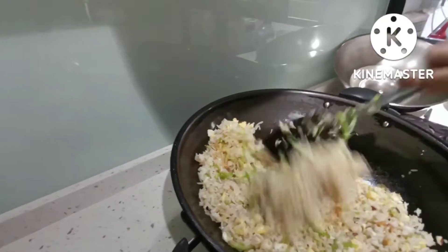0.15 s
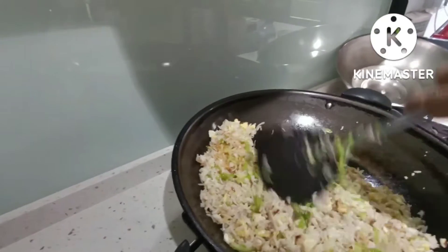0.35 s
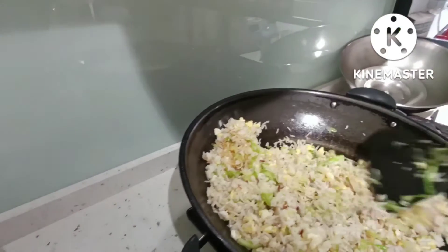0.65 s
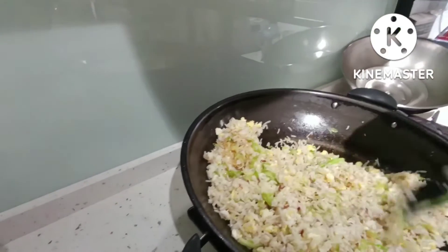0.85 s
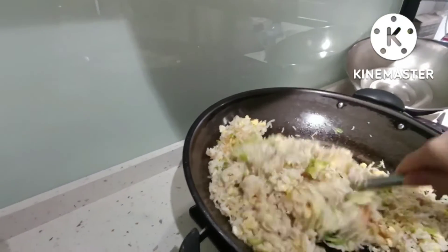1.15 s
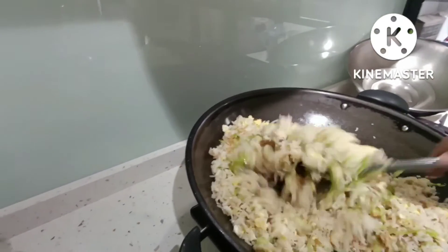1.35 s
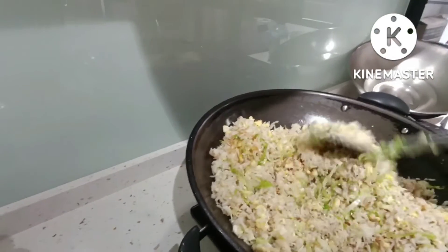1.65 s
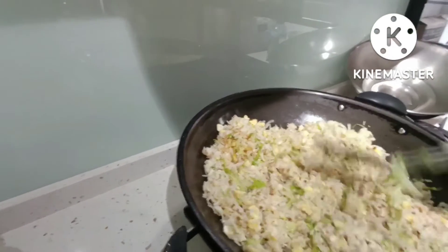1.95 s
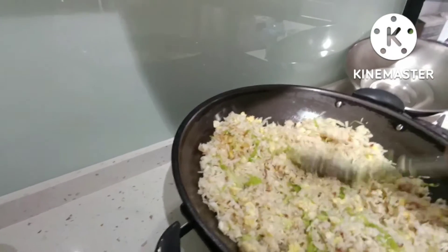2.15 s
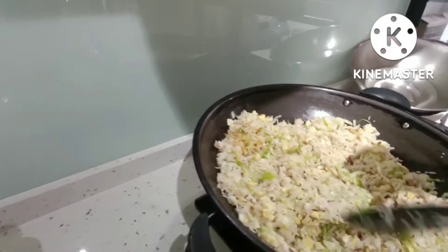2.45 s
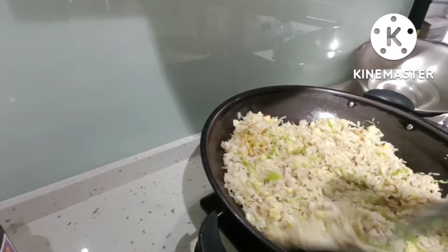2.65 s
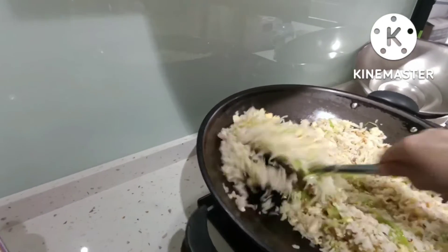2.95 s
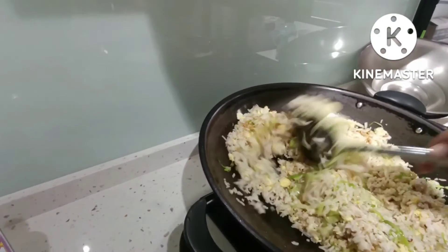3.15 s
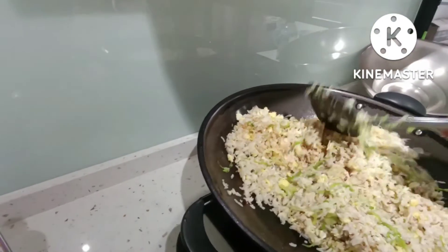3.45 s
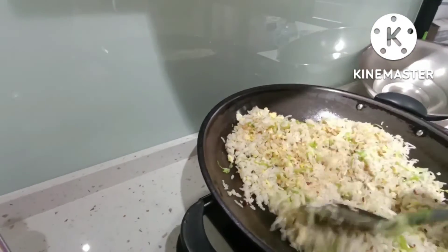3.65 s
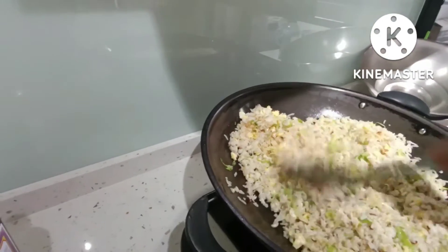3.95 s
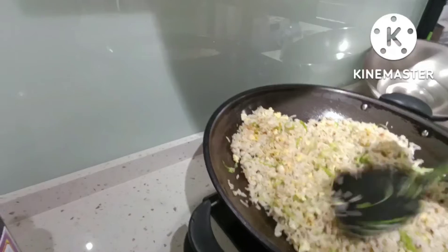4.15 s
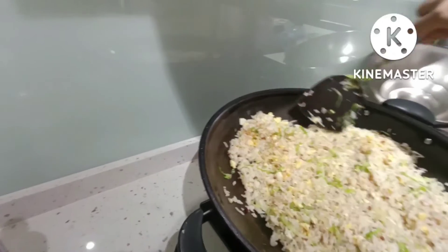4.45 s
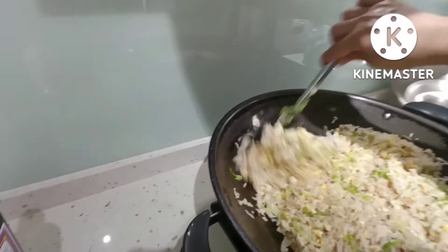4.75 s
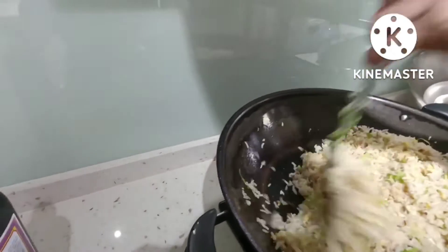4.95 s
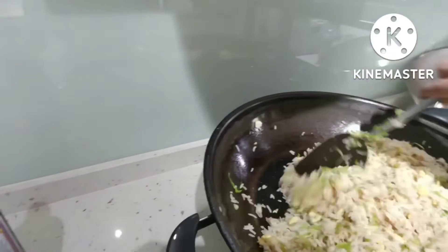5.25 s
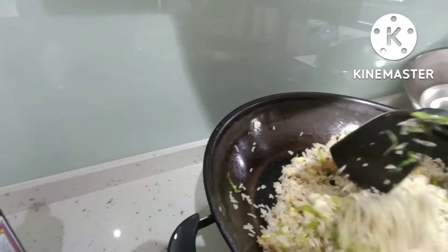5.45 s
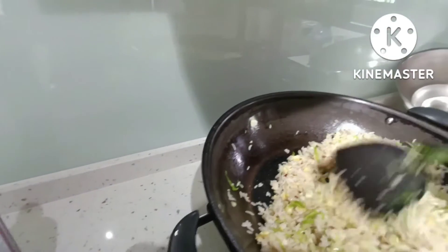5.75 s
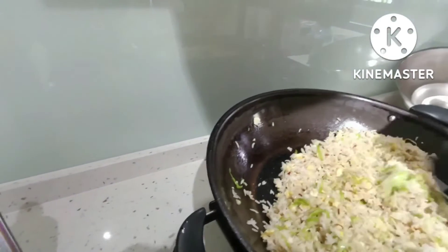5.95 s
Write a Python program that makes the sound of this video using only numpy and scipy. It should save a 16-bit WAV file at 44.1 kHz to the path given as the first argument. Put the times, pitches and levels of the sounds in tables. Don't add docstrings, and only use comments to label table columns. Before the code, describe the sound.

Rice is stir-fried close by: metallic scrapes, sharp taps, dull thumps, faint grainy hiss, and one ringing clang at the very end.

```python
import sys
import numpy as np
from scipy import signal
from scipy.fft import rfft, irfft, next_fast_len
from scipy.io import wavfile

SR = 44100
rng = np.random.default_rng(int(sys.argv[2]) if len(sys.argv) > 2 else 0)


def master_out(mix):
    frames = np.transpose(np.atleast_2d(mix))
    ceiling = np.clip(frames, -1, 1)
    pcm = np.round(ceiling * 32767).astype(np.int16)
    wavfile.write(sys.argv[1], SR, pcm)


def volts_from_db(level):
    exponent = np.asarray(level, float) / 20
    return 10 ** exponent


N = 268107

# pitch_hz, width_hz, level_db
STAND_MODES = [(73, 14, 0), (113.4, 20, 2), (182, 12, -19), (207, 86, -1.5), (288, 24, -0.5), (336, 7.5, 3)]
# pitch_hz, width_hz, level_db
BOWL_MODES = [(213, 19, -9), (290, 48, -0.5), (379, 9.7, 11), (437, 92, -5), (590, 38, 6), (652, 21, 3.5),
              (762, 27, -2), (873.5, 300, -1.5), (941, 34, 2.5), (1000, 74, 5), (1103, 62, -1),
              (1288, 57, -1), (1360, 210, -4.5), (1411, 67, -2), (1650, 120, -7), (1910, 37, -2),
              (2295, 210, -14.5)]
# pitch_hz, width_hz, level_db
BLADE_MODES = [(2258, 65, -4.5), (2440, 45, -22), (2640, 66, -8), (2790, 55, -12), (3240, 110, -8),
               (3353, 210, -0.5), (3750, 97, -6.5), (3900, 140, -6), (4514, 350, 0.5), (4423, 94, -8),
               (4940, 81, -3.5), (5960, 140, -18), (6150, 390, -14), (6400, 240, -13), (7970, 220, -21.5)]
# pitch_hz, width_hz, level_db
RASP_BANDS = [(2800, 1400, -4.5), (3600, 920, -1.5), (4530, 270, 0), (6300, 1200, -24.5)]
# start_s, length_s, pressure_db, edge_over_bowl_db,
# place_hz (bowl pitch favoured by the contact place)
DRAGS = [(0.859, 0.024, -41.5, -8.5, 680), (0.908, .095, -35.5, -11.5, 600), (1.034, 0.16, -54, -9.5, 600),
         (1.137, 0.034, -49.5, -26, 800), (1.235, 0.028, -62.5, -6.5, 810), (2.504, 0.004, -27, -4.5, 918),
         (2.535, 0.092, -41.5, -1, 920), (2.632, 0.05, -45, -1.5, 930), (2.716, 0.079, -53.5, -4, 746),
         (2.819, 0.13, -61, -7, 694), (4.425, .015, -48, -4.5, 820), (4.461, 0.065, -53, -2.5, 660),
         (4.534, 0.015, -62, 9.5, 700), (4.561, 0.013, -47.5, -8, 630), (4.596, 0.063, -54, 4.5, 600),
         (4.666, 0.025, -57, 7.5, 656), (4.707, 0.074, -67.5, 1.5, 700), (6.057, .03, -57.5, 6.5, 644)]


def scrapes():
    bite_s, sag_db_per_s, lift_db_per_s = 0.012, 58.5, 334
    slips = grains(6000 * volts_from_db(1.5 * drift(90)), spread_db=2.0)
    start_s, length_s, pressure_db, edge_db, place_hz = np.transpose(DRAGS)[:, :, None]
    press_db = pressure_db + peaked(start_s, 20 / bite_s, sag_db_per_s)
    press_db = press_db + peaked(start_s + length_s, 0, lift_db_per_s)
    press = summed(press_db) + 1e-12
    mean_place_hz = (summed(press_db + 20 * np.log10(place_hz)) + 1e-9) / press

    bare = np.clip(0.87 + 0.73 * edge_db, 0.01, 1)
    ring_gain = summed(press_db + edge_db + 20 * np.log10(bare))
    rasp_gain = summed(press_db + edge_db + 10 * np.log10(1 - bare ** 2 + 1e-6))
    shake_gain = summed(press_db - 3.5 - 12.5 * np.log2(place_hz / 600))

    stand = shake_gain * body(slips, STAND_MODES, wander_db=4.0)
    bowl = press * body(slips, BOWL_MODES, wander_db=1.8, place_hz=np.clip(mean_place_hz, 300, 2000))
    ring = ring_gain * body(slips, BLADE_MODES, wander_db=1.5)
    rasp = rasp_gain * body(slips, RASP_BANDS, wander_db=4.0)
    return stand + bowl + ring + rasp


# start_s, peak_db, thud_hz (centre of the thud), brightness_db,
# blade_hz (blade pitch favoured)
TAPS = [(.9254, -23, 500, -2.5, 4230), (1.153, -38, 900, -10.5, 4960), (1.54, -49.5, 1000, -2, 4500),
        (1.999, -61, 1000, -10, 4500), (2.485, -28.5, 1510, -4, 3030), (2.494, -16, 1300, -0.5, 3900),
        (4.289, -54, 1400, 0.5, 6500), (4.4165, -37.5, 950, 6.5, 4970), (4.436, -41, 790, 3.5, 3140),
        (4.656, -48, 517, 15, 4500), (5.21, -56, 890, 6, 5500)]
THUMPS = [(.8525, -24, 720, -14, 4600), (.902, -33, 1090, -7, 3500), (.944, -27, 740, -12, 4500),
          (.997, -31.5, 590, -1.5, 4600), (1.245, -56, 900, -8, 4500), (2.4925, -22.5, 1000, 9, 4950),
          (2.752, -51, 775, -21, 4470), (2.785, -46, 720, -21, 4500), (2.83, -50, 663, -19, 4500),
          (4.553, -36.5, 560, -4, 4600), (5.596, -43, 553, -15, 4500), (5.802, -53.5, 550, -14, 4500)]
CATCHES = [
    (1.136, -49, 1910, -28, 3280),
    (6.055, -42.5, 1420, -8, 3600),
    (6.072, -16.5, 590, -16, 4520),
]
JOLTS = [
    (.62, -55.5, 220, -31, 4630),
    (1.39, -42, 600, -13, 4500),
    (4.2545, -41, 550, -25, 4500),
    (5.7539, -38, 590, -36, 4500),
]


def knocks():
    out = np.zeros(N + SR)
    # blows, t60_s, contact_ms, push on the stand in dB
    kinds = ((TAPS, 0.046, 0.5, -40), (THUMPS, 0.041, 3.6, -41),
             (CATCHES, 0.21, 5.0, -57), (JOLTS, 0.04, 0.25, -14))
    for blows, t60_s, contact_ms, push_db in kinds:
        for start_s, peak_db, thud_hz, bright_db, blade_hz in blows:
            sound = blow(thud_hz, bright_db, blade_hz, t60_s, contact_ms, push_db)
            out[round(start_s * SR):][:len(sound)] += volts_from_db(peak_db) * sound
    return out[:N]


def blow(thud_hz, bright_db, blade_hz, t60_s, contact_ms, push_db):
    t = np.arange(SR // 4) / SR
    low_hz = np.array(BOWL_MODES)[:, :1]
    high_hz, high_db = np.array(BLADE_MODES)[:, :1], np.array(BLADE_MODES)[:, 2:]

    focus_db = 8.8 + 5.4 * contact_ms
    near_db = -focus_db * np.abs(np.log2(low_hz / thud_hz)) + rng.normal(0, 1.6, low_hz.shape)
    lasting_s = t60_s * (600 / low_hz) ** 0.71
    low_phase = rng.normal(0, 0.71, low_hz.shape)
    low_waves = np.sin(2 * np.pi * low_hz * t + low_phase)
    thud = np.sum(volts_from_db(near_db - 60 * t / lasting_s) * low_waves, axis=0)
    thud *= 1 - np.exp(-t / (0.0031 * contact_ms))

    shine_db = high_db - 6.5 * np.abs(np.log2(high_hz / blade_hz)) + rng.normal(0, 1, high_hz.shape)
    high_waves = np.sin(2 * np.pi * high_hz * t + rng.uniform(0, 2 * np.pi, high_hz.shape))
    shine = np.sum(volts_from_db(shine_db - 60 * t / (0.64 * t60_s)) * high_waves, axis=0)
    crack = signal.lfilter([0.5], [1, -0.5], rng.standard_normal(len(t))) * np.exp(-t / 0.0028)
    bright = (shine / np.abs(shine).max() + 0.69 * crack) * (1 - np.exp(-t / 0.00079))

    push = 0
    for hz, _, db in STAND_MODES[1:4]:
        push = push + volts_from_db(db - 60 * t / 0.24) * np.sin(2 * np.pi * hz * t)
    return thud / np.abs(thud).max() + volts_from_db(bright_db) * bright + volts_from_db(push_db) * push


# pitch_hz, density_db (dB per Hz)
SIZZLE_SPECTRUM = [(880, -2), (1500, 3.5), (2050, -27.5), (2290, 0), (2470, -2.5), (4050, -5.5),
                   (4740, 0.5), (5510, -9.5), (7280, -7.5), (7820, -17), (8280, -42.5), (10800, -65.5),
                   (18200, -120)]
# peak_s, hiss_db, length_s, clatter_over_hiss_db (on the bowl)
HEAPS = [(0.0, -66.5, 0.42, -1), (0.331, -64, 0.02, 1), (0.393, -57, 0.065, -9), (0.473, -69, 0.16, 3),
         (0.769, -66.5, .05, 0), (1.309, -63, 0.16, -4), (1.425, -70, 0.094, -5), (1.6, -60, 0.37, -5),
         (1.864, -66, 0.033, 2), (2.103, -57.5, 0.15, -0.5), (2.256, -73, 0.48, -1), (3.058, -84, .03, 8),
         (3.217, -79, .06, 2), (3.335, -58.5, 0.25, -6), (3.677, -63.5, 0.024, 2), (3.82, -59.5, 0.26, -4),
         (3.959, -70, 0.028, 11.5), (4.287, -68, 0.3, -1.5), (4.77, -63, 0.13, -1.5), (4.9, -67, 0.017, -7),
         (5.071, -67, 0.17, 4.5), (5.214, -63, 0.04, -5), (5.162, -66, 0.13, -11), (5.606, -69, 0.23, 6),
         (5.843, -81.5, 0.1, 15.5)]


def rice():
    peak_s, hiss_db, length_s, clatter_db = np.transpose(HEAPS)[:, :, None]
    heap_db = hiss_db + peaked(peak_s, 17 / (0.61 * length_s), 17 / length_s)

    pops = 1.7 * grains(60, spread_db=3.0)
    surge = volts_from_db(2.1 * drift(41))
    spits = [grains(6000 * surge, spread_db=3.0) + pops for _ in range(2)]
    steady = np.hypot(volts_from_db(-70.5), volts_from_db(-75.5))
    sizzle = np.hypot(steady, summed(heap_db)) * colour(spits, SIZZLE_SPECTRUM, patchy_db=0.15)

    clatter = np.hypot(volts_from_db(-76), summed(heap_db + clatter_db))
    patter = clatter * body(grains(1500, spread_db=4.5), BOWL_MODES[4:], wander_db=2.5)
    return sizzle + patter


def kitchen(x):
    size = next_fast_len(N + SR)
    hz = np.arange(size // 2 + 1) * SR / size
    t60_s = 0.48 / np.sqrt(1 + (hz / 3000) ** 2)
    echo = 0
    for k, lag_s in enumerate(rng.uniform(0.008, 0.04, size=10)):
        loop = volts_from_db(-60 * lag_s / t60_s) * np.exp(-2j * np.pi * hz * lag_s)
        echo = echo + (-1) ** k * loop / (1 - loop)
    return irfft(rfft(x, size) * echo, size)[:N]


# pitch_hz, density_db (dB per Hz)
MURMUR_SPECTRUM = [(15, -43), (25, -14), (54, -2.5), (75, -26), (106, -8), (136, -10.5), (386, -10.5),
                   (505, -12), (636, -13.5), (687, -14), (787, -10.5), (2500, -33), (3250, -64),
                   (5500, -120)]


def fan():
    murmur = volts_from_db(-64) * colour(rng.standard_normal((2, N)), MURMUR_SPECTRUM, patchy_db=1.7)
    boom_hz, boom_width_hz = 104.9, 14
    boom = resonate(rng.standard_normal(N), boom_hz, boom_width_hz)
    boom = rms_one(resonate(boom, boom_hz, boom_width_hz))
    boom = volts_from_db(-71 + 5 * drift(2.8)) * boom
    hum_hz = 42
    hum = volts_from_db(-74.5) * np.sin(2 * np.pi * hum_hz * np.arange(N) / SR + 0.073 * drift(0.79))
    return murmur + boom + hum


def grains(per_s, spread_db):
    sizes = volts_from_db(spread_db * np.minimum(rng.exponential(1, N), 5)) * rng.choice([-1, 1], N)
    return sizes * (rng.random(N) < per_s / SR) + 1e-18


def resonate(x, hz, width_hz):
    r = np.exp(-np.pi * width_hz / SR)
    poles = [1, -2 * r * np.cos(2 * np.pi * hz / SR), r * r]
    return signal.lfilter([(1 - r * r) / 2, 0, (r * r - 1) / 2], poles, x)


def body(x, modes, wander_db, place_hz=None):
    out, power = 0, 0
    for k, (hz, width_hz, db) in enumerate(modes):
        octaves_off = 0 if place_hz is None else np.abs(np.log2(hz / place_hz))
        share = volts_from_db(db - 4.4 * octaves_off) * np.sqrt(width_hz)
        late = np.roll(x, 97 * k * k % 401)
        out = out + share * volts_from_db(wander_db * drift(21)) * rms_one(resonate(late, hz, width_hz))
        power = power + share ** 2
    return out / np.sqrt(power)


def colour(x, spectrum, patchy_db):
    hz, db = np.transpose(spectrum)
    edges = 25 * 2 ** np.arange(0, 8.7, 1 / 3)
    out = 0
    for k, (low, high) in enumerate(zip(edges, edges[1:])):
        band_filter = signal.butter(2, [low, high], "band", fs=SR, output="sos")
        band = signal.sosfilt(band_filter, x[k % 2])
        level_db = np.interp(np.log(low * high) / 2, np.log(hz), db)
        out = out + band * volts_from_db(level_db + patchy_db * drift(12.0))
    return rms_one(out)


def drift(rate_hz):
    r = np.exp(-80 * np.pi * rate_hz / SR)
    slow = signal.lfilter([1], [1, -2 * r, r * r], rng.standard_normal(N // 40 + 2002))[2000:]
    return np.interp(np.arange(N) / 40, np.arange(len(slow)), rms_one(slow))


def peaked(peak_s, rise_db_per_s, fall_db_per_s):
    late_s = np.arange(0, N, 32) / SR - peak_s
    return -np.maximum(-rise_db_per_s * late_s, fall_db_per_s * late_s)


def summed(db):
    power = np.sum(volts_from_db(2 * db), axis=0)
    return np.interp(np.arange(N) / 32, np.arange(len(power)), np.sqrt(power))


def rms_one(x):
    return x / np.sqrt(np.mean(x ** 2) + 1e-20)


def scene():
    wok = scrapes() + knocks()
    return (wok + volts_from_db(-17.5) * kitchen(wok) + rice() + fan())[None]


def roll_off(x):
    return signal.sosfilt(signal.butter(12, 8430, fs=SR, output="sos"), x)


def record(dry):
    cutoff_hz = 8445
    treble_cut = signal.cheby2(14, 70, 1.055 * cutoff_hz, fs=SR, output="sos")
    bass_cut = signal.butter(2, 48, "high", fs=SR, output="sos")
    mix = signal.sosfilt(bass_cut, signal.sosfilt(treble_cut, dry))
    return roll_off(mix)


dry = scene()
out = record(dry)
master_out(out)
```